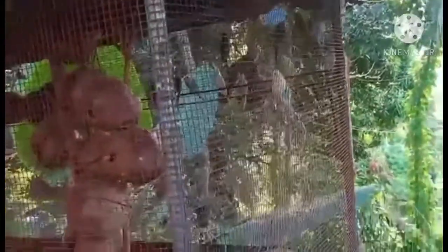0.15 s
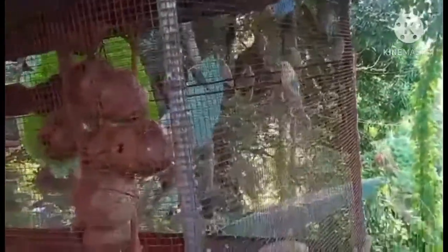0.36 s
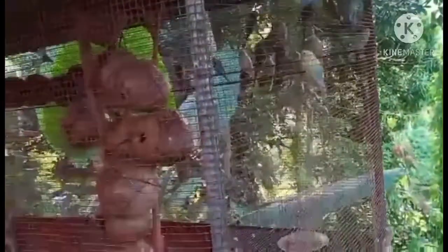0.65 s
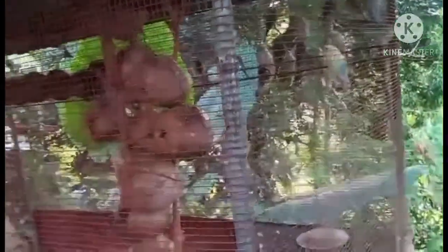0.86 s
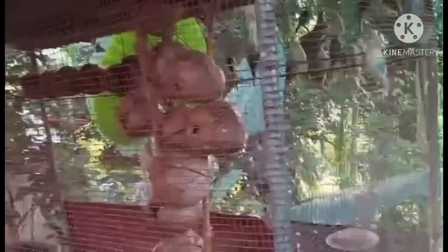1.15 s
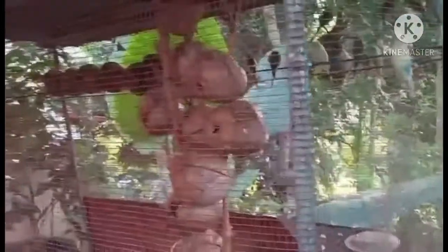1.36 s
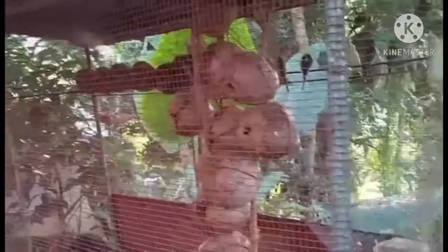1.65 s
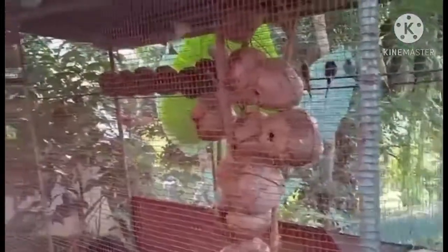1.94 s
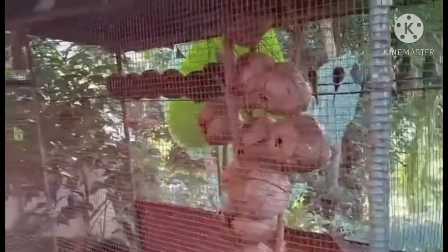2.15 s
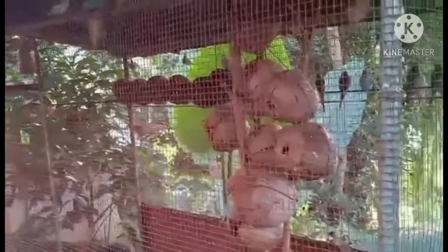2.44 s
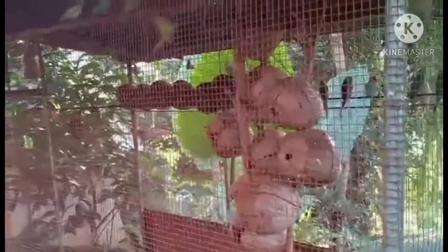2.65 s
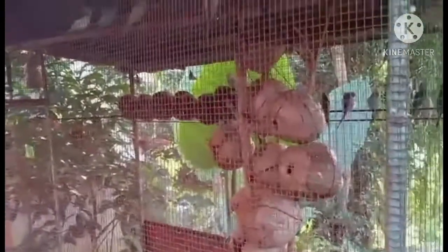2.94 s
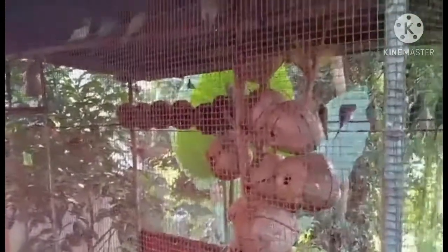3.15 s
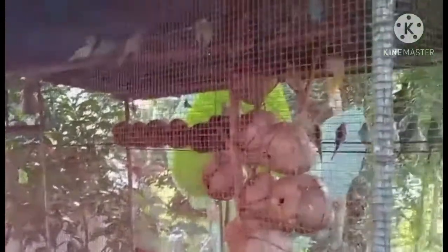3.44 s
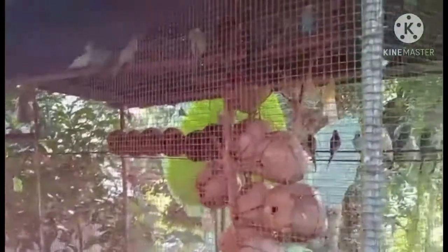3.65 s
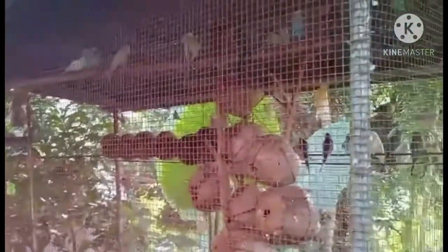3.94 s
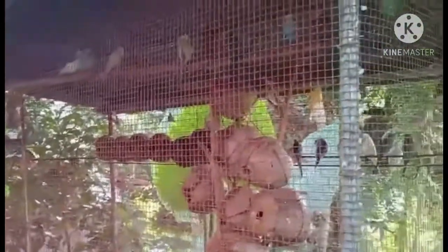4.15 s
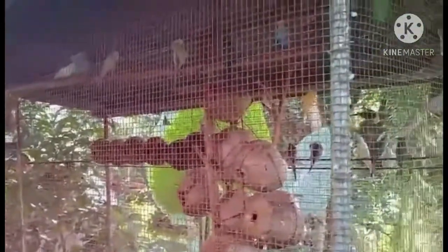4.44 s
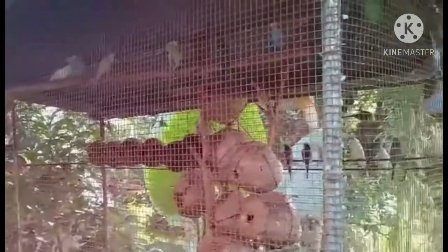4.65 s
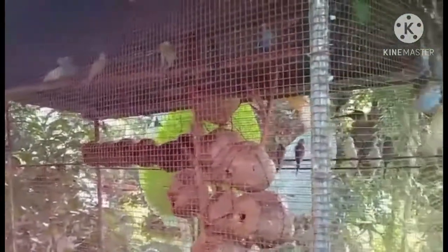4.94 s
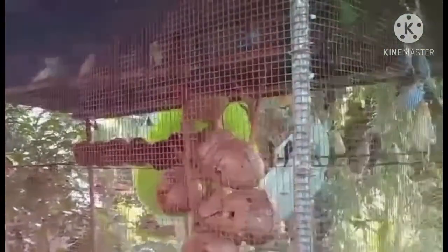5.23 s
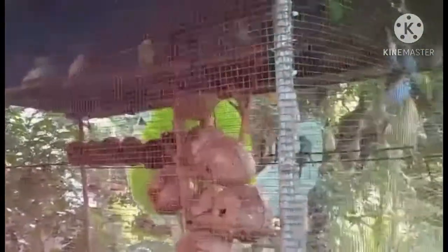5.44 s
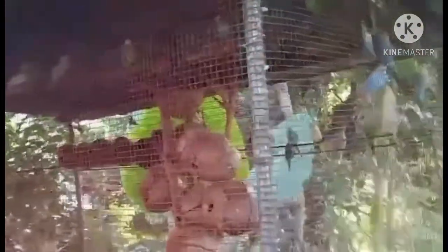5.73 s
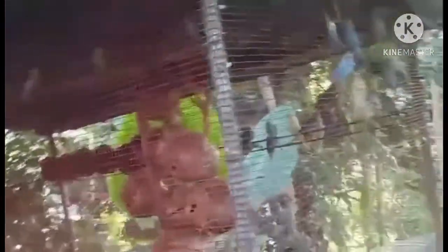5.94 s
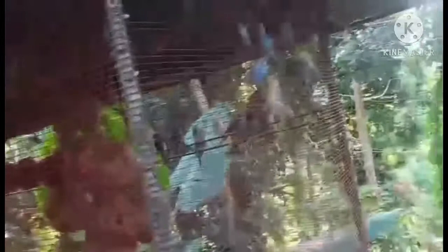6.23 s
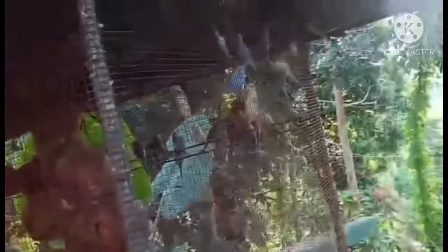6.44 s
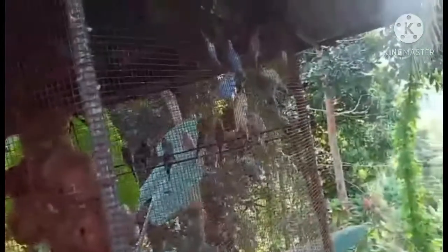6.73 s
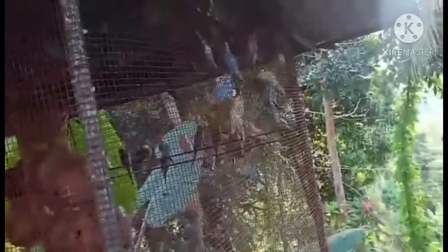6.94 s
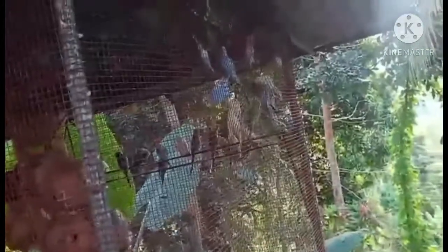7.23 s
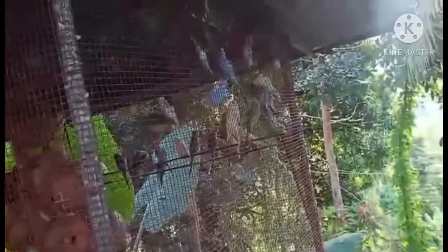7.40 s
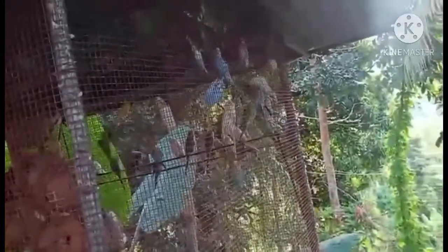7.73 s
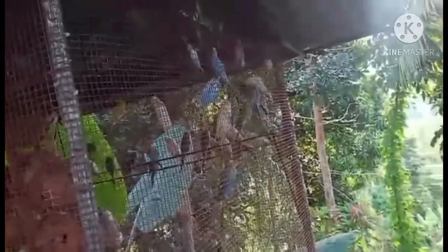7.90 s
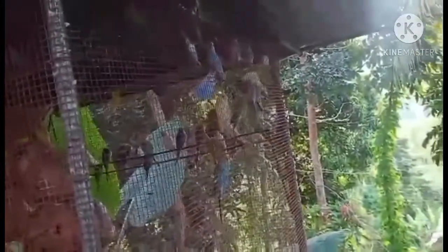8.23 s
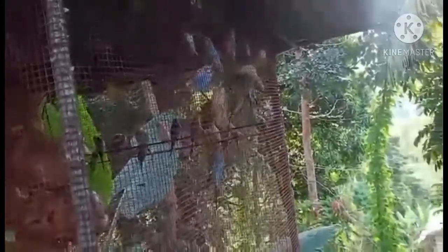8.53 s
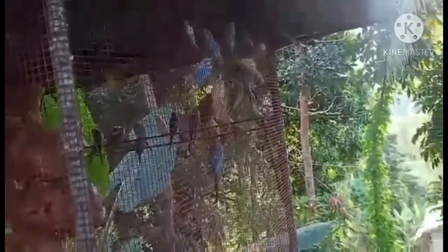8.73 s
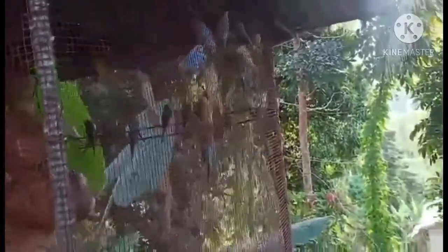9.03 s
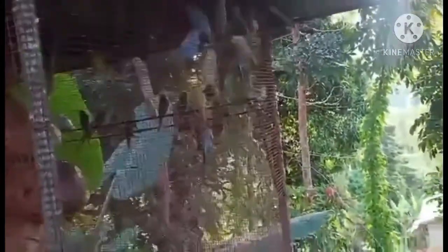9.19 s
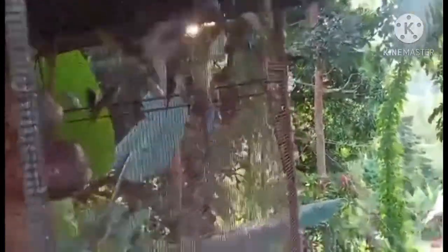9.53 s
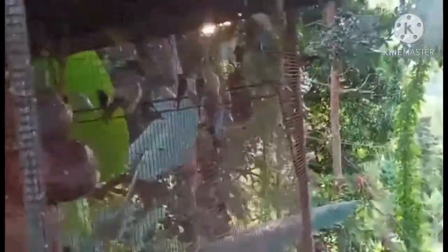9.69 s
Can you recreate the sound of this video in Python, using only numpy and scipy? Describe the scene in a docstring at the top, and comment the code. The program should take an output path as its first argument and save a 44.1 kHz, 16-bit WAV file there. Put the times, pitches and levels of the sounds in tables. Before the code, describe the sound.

Many budgerigars chatter continuously in a roofed wire cage: quick U-shaped whistles, buzzy rasps, nasal squeaks, sharp pips and a dense warble further back. Beaks and claws tick finely on wire. A hoarse rooster crows once, from about two to four seconds. The hand-held stereo microphone is close, with short dense echoes, light hiss, faint low hum and dull handling rubs.

```python
"""A flock of budgerigars chatters in a wire aviary under a roof: swooping whistles, pulsed rasps that ring in
throat and beak, nasal squeaks of sliding harmonics, and a warble of random sweeps further back.
Beaks and claws tick on the wire as filtered clicks. A rooster crows once from the left, hoarsely, with two voices.
The hand-held microphone turns, rustles with dull noise and ticks once over background hiss and a faint hum."""
import sys
import numpy as np
from scipy import signal
from scipy.fft import rfft, irfft, next_fast_len
from scipy.io import wavfile
from scipy.ndimage import uniform_filter1d

SR = 44100
rng = np.random.default_rng(int(sys.argv[2]) if len(sys.argv) > 2 else 0)


def digitize_waveform(pressure):
    """Quantize a signal to 16-bit integers and store it at the path in sys.argv[1].

    Rows of a 2-D input are taken as channels; values are limited to [-1, 1].
    """
    field = np.atleast_2d(pressure).T
    bounded = np.clip(field, -1, 1)
    quanta = np.round(bounded * 32767).astype(np.int16)
    wavfile.write(sys.argv[1], SR, quanta)


N = 434826
TIME = np.arange(N) / SR

# Table levels are relative, ahead of the mix; bird call lengths are nominal, and some calls get a little extra.
# spectrum of the background hiss: f/Hz, density/dB
HISS_SPECTRUM = [(30, -10), (110, 0.5), (300, -6), (800, -8.5), (1100, -2.5), (1450, 7), (2300, -4.5),
                 (3900, -9.5), (5200, -2.5), (6300, 6.5), (7200, -19), (8600, -2), (10000, -26),
                 (14000, -40)]
# swells of the low hum: t/s, level/dB
HUM_LEVEL = [(0.0, -58), (0.47, -76), (0.58, -54), (0.88, -68), (2.36, -53), (2.39, -65.5), (6.78, -61.5),
             (6.97, -99), (7.3, -49), (7.39, -61.5), (8.35, -51), (8.43, -85), (9.72, -50), (9.86, -70)]
# soft rubs of the hand on the housing: t/s, length/s, centre f/Hz, level/dB
HAND_RUBS = [(1.551, 0.17, 269, -53), (1.823, 0.13, 230, -48.5), (1.861, 0.53, 153, -52),
             (4.038, 0.086, 314, -56.5), (5.375, 0.12, 242, -57.5), (6.013, 0.1, 312, -56.5),
             (6.3, 0.11, 322, -62), (8.973, 0.32, 241, -58), (9.337, 0.4, 270, -49.5),
             (9.38, 0.49, 163, -48)]
# how much more the left port hears than the right: f/Hz, difference/dB
PORT_DIFFERENCE = [(100, 1), (400, 0.5), (1200, 6.5), (2300, 7), (4000, -5.5), (5500, 2), (8000, 7.5),
                   (13000, 12.5)]
# liveliness of the birds further back: t/s, level/dB
FLOCK_LEVEL = [(0.0, -38), (0.19, -44.5), (.75, -41), (1.5, -38.5), (1.67, -40.5), (2.0, -35),
               (2.25, -40.5), (3.85, -38.5), (4.01, -40), (4.2, -40), (4.5, -35), (4.7, -40.5),
               (5.16, -42.5), (5.42, -40), (5.79, -40.5), (6.17, -38.5), (6.3, -37), (6.56, -38),
               (6.68, -44.5), (6.75, -34), (7.0, -41), (7.17, -34.5), (7.46, -38.5), (7.85, -37.5),
               (8.41, -39.5), (8.7, -39.5), (8.9, -36.5), (8.98, -50.5), (9.08, -37), (9.26, -56.5),
               (9.86, -50)]
# the crow's leading voice: t/s, pitch f/Hz, fundamental level/dB, overtone level/dB, hoarseness (held to 0-1)
CROW_LEAD = [(2.283, 563, -54, -37, 0.19), (2.326, 624, -30, -30, .1), (2.39, 692, -21.5, -27, 0.3),
             (2.436, 715.5, -24.5, -32, 0.76), (2.481, 680, -33, -34, 0.89), (2.565, 651, -54, -36, 0.92),
             (2.625, 764, -20, -36, 0.76), (2.68, 769, -29, -36, 1.23), (2.771, 707, -47, -43, 1.13),
             (2.815, 737, -24, -31.5, 0.58), (2.9, 732, -32.5, -26, 0.55), (2.946, 703, -24.5, -30, .7),
             (3.03, 702, -31.5, -34, 0.9), (3.2, 657.4, -46, -39, 0.98), (3.281, 639, -44, -46, 0.77),
             (3.319, 681, -24.5, -27.5, 0.3), (3.38, 695, -20, -26.5, .1), (3.448, 661, -27, -34.5, 0.11),
             (3.54, 644, -25, -32, 0.2), (3.651, 607, -35, -41.5, 0.21), (3.69, 567, -37.5, -31, 0.6),
             (3.79, 539.5, -40, -36, 0.65), (3.9, 436, -65, -37.5, 0.4)]
# the crow's lower second voice: t/s, pitch f/Hz, level/dB
CROW_SECOND = [(2.37, 596, -54), (2.42, 596, -22.5), (2.48, 587, -27.5), (2.55, 562.6, -31),
               (2.62, 595, -28), (2.71, 575, -30), (2.765, 613, -25.5), (2.82, 588, -27), (2.86, 584, -41),
               (2.94, 570, -28), (3.05, 597, -26), (3.15, 587, -28), (3.25, 566.6, -38.5), (3.32, 558, -26),
               (3.41, 561, -77), (3.5, 560, -92)]
# colour of the rooster's throat: f/Hz, level/dB
ROOSTER_THROAT = [(450, -16.5), (700, 5), (1000, -20.5), (1300, -15), (1750, -12.5), (2050, -19),
                  (2380, -9.5), (2900, -24.5), (3550, -20), (4300, -28.5), (6000, -36.5), (9500, -40),
                  (13000, -59)]
# resonances of a rasping bird, throat and beak: f/Hz, width/Hz, level/dB
THROAT_MODES = [(2565, 2150, 0.5), (3695, 640, 3.5)]
BEAK_MODES = [(6110, 2400, -1.5), (7850, 1460, -11), (10420, 3400, -32)]
# where near birds sit as the microphone turns: t/s, lag of the left ear/ms, left over right level/dB
# (the level column places contact calls and pips only)
BEARINGS = [(0, 0.26, 3.5), (1.5, 0.049, -3), (2.201, -.28, 1), (3.7, -0.12, -14), (4.8, 0.086, -10),
            (5.4, .08, -5.5), (6, .22, -7), (9.86, 0.3, -1.5)]
# buzzy rasps: t/s, length/s, throat level/dB, treble level/dB
RASP_CALLS = [(0.221, 0.049, -35, -33), (0.392, 0.084, -38.5, -32.5), (0.884, 0.065, -32, -34),
              (1.056, 0.078, -27, -27), (1.552, 0.0026, -44, -29.5), (1.615, 0.011, -42, -35),
              (1.773, 0.044, -34, -45), (1.855, 0.014, -42, -32.5), (1.914, 0.086, -39.5, -38.5),
              (2.589, 0.18, -30.5, -36), (3.875, 0.11, -29.5, -42.5), (4.034, 0.055, -34.5, -38.5),
              (4.212, 0.064, -37, -36.5), (4.3, 0.076, -32.5, -29.5), (4.393, 0.1, -33, -66),
              (4.775, 0.016, -29.5, -41), (4.865, 0.03, -31, -51), (5.099, 0.042, -32, -34.5),
              (5.441, 0.0071, -33, -35.5), (5.485, 0.067, -32, -51), (5.597, 0.025, -31, -33),
              (5.743, 0.017, -35, -34), (5.834, 0.043, -33.5, -28), (5.976, 0.045, -28.5, -27),
              (6.199, 0.03, -33.5, -40), (6.364, 0.025, -36, -36), (6.421, 0.071, -28, -67),
              (6.844, 0.032, -37, -48), (6.898, 0.027, -31, -29), (7.275, 0.015, -36.5, -40),
              (7.71, 0.066, -38, -33.5), (7.783, 0.086, -34, -39), (8.21, 0.036, -35, -52),
              (8.586, 0.04, -32.5, -53), (8.873, 0.027, -39, -33), (9.048, 0.05, -47, -50)]
# contact calls, a dive and a climb back: t/s, length/s, lowest f/Hz, level/dB
CONTACT_ROWS = [(.305, 0.053, 2840, -36), (0.505, 0.046, 2610, -29.5), (0.622, 0.036, 2920, -29.5),
                (0.724, 0.039, 2540, -34), (1.27, 0.073, 2910, -34), (2.058, 0.064, 2690, -31),
                (2.11, 0.049, 2800, -35.5), (2.594, 0.063, 2916, -24), (3.068, 0.086, 3510, -24.5),
                (3.895, 0.077, 3425, -21.5), (4.068, 0.066, 2840, -27.5), (4.389, 0.076, 2800, -27.5),
                (4.597, 0.062, 2860, -30.5), (4.817, 0.055, 2870, -21), (5.305, 0.072, 2807, -21.5),
                (5.407, 0.065, 2450, -31.5), (5.449, 0.049, 3316, -22.5), (6.046, 0.048, 2620, -25),
                (6.233, 0.082, 2640, -31), (6.436, 0.078, 3020, -32), (6.516, 0.065, 2810, -29.5),
                (6.723, 0.061, 2860, -38.5), (7.096, .056, 2780, -29), (7.145, 0.049, 2985, -26.5),
                (7.508, 0.056, 2720, -27), (7.878, 0.072, 3170, -28), (8.063, 0.06, 2750, -26.5),
                (8.661, 0.054, 2724, -27), (9.483, 0.065, 2720, -23.5)]
# low chirrups with a shallow dip: t/s, length/s, middle f/Hz, level/dB
CHIRRUP_ROWS = [(.275, 0.016, 1970, -30), (.705, 0.021, 1932, -27), (5.5, 0.0092, 1450, -27),
                (5.941, 0.052, 1484, -24.5), (6.27, 0.066, 1873, -29.5), (6.49, 0.043, 2154, -26),
                (6.573, 0.019, 2220, -28), (7.205, 0.021, 1906, -30), (7.59, 0.053, 2000, -35),
                (8.125, 0.02, 2306, -26.5)]
# falling slurs: t/s, length/s, middle f/Hz, level/dB
SLUR_ROWS = [(.205, 0.013, 2150, -34), (.79, 0.035, 1396, -33), (.962, 0.021, 1715, -37.5),
             (1.378, 0.024, 3340, -24), (1.412, .02, 1710, -31.5), (2.015, 0.02, 3800, -31),
             (2.14, .018, 1636, -27), (4.218, .022, 3600, -33), (4.455, 0.035, 2400, -29.5),
             (4.545, 0.028, 3560, -27.5), (4.575, 0.018, 3450, -28), (4.798, 0.008, 3230, -27),
             (4.806, 0.015, 2300, -29.5), (5.24, 0.03, 2150, -31.5), (5.38, .022, 2000, -34.5),
             (7.235, .155, 1800, -29), (7.28, 0.13, 2470, -46), (7.4, 0.039, 2760, -46),
             (7.72, 0.07, 1740, -40), (7.85, 0.1, 1680, -33.5), (7.88, 0.017, 2210, -38),
             (8.23, 0.021, 2600, -32), (8.295, 0.02, 1960, -35), (8.318, 0.02, 1740, -31),
             (8.59, 0.071, 3560, -32.5), (8.604, 0.01, 2420, -33), (8.664, 0.017, 2260, -28),
             (8.888, .015, 2215, -33), (9.464, 0.015, 3970, -29)]
# rising tweets: t/s, length/s, middle f/Hz, level/dB
TWEET_ROWS = [(.043, 0.026, 3900, -32.5), (.388, 0.017, 2334, -28), (.882, 0.02, 1980, -31),
              (2.66, 0.081, 4906, -29.5), (3.03, 0.027, 3810, -25), (3.48, 0.026, 3750, -28),
              (4.133, 0.018, 4280, -26.5), (4.505, 0.033, 3380, -33), (5.27, 0.031, 2790, -23),
              (5.813, 0.024, 2580, -28), (6.78, .03, 3350, -37), (7.437, .024, 2480, -36),
              (7.595, 0.029, 2740, -34), (9.022, .016, 2430, -37), (9.25, 0.0095, 2380, -35.5),
              (9.449, 0.011, 3900, -34.5), (9.825, .012, 3800, -32.5)]
# arched peeps: t/s, length/s, top f/Hz, level/dB
PEEP_ROWS = [(.115, 0.12, 3846, -27.5), (.343, 0.007, 3540, -27.5), (.55, 0.045, 3470, -36),
             (.675, 0.032, 2230, -28.5), (1.32, 0.06, 2380, -31), (3.67, 0.062, 4045, -27),
             (7.06, 0.037, 3990, -32), (9.113, 0.028, 2730, -31.5), (9.835, 0.036, 4200, -28)]
# sharp pips and the accents within longer calls: t/s, length/s, middle f/Hz, level/dB
PIP_ROWS = [(0.301, 0.01, 3660, -27), (0.35, 0.021, 2237, -19), (.459, .011, 5280, -31),
            (0.477, 0.013, 2000, -27), (0.723, 0.0066, 1890, -23), (1.55, 0.0069, 5780, -28),
            (2.604, 0.0055, 3220, -28), (3.679, 0.0069, 3787, -25), (3.703, 0.014, 3988, -23),
            (4.795, 0.0061, 3420, -33), (4.815, 0.02, 3580, -16.5), (4.858, 0.015, 3520, -16.5),
            (5.295, 0.009, 4030, -19.5), (5.449, 0.0052, 3890, -14.5), (5.48, 0.011, 3480, -15),
            (5.524, .006, 3040, -19), (5.533, 0.0126, 3830, -22), (5.547, .006, 3100, -19.5),
            (6.899, 0.0052, 4670, -25.5), (6.484, 0.0093, 3600, -40), (6.498, 0.01, 2220, -24),
            (6.512, 0.0095, 3640, -28), (7.14, 0.011, 3340, -28), (7.181, 0.019, 3445, -28),
            (7.941, 0.0061, 3520, -22), (8.667, 0.0088, 3445, -31), (9.115, 0.0064, 2480, -26),
            (9.131, 0.013, 2565, -30), (9.49, .008, 3460, -29), (9.56, 0.0061, 4110, -24)]
# nasal squeaks: t/s, length/s, first f/Hz, middle f/Hz, last f/Hz, level/dB
SQUEAK_ROWS = [(0, 0.041, 2570, 2893, 3050, -25), (0.254, 0.036, 3330, 2935, 3700, -24),
               (0.42, 0.039, 2815, 2890, 3860, -28.5), (4.26, 0.063, 3420, 2660, 3320, -26),
               (4.323, 0.047, 2750, 3100, 3700, -35), (5.605, 0.034, 2764, 2857, 2930, -14),
               (5.686, 0.037, 2315, 2635, 2750, -23), (5.867, 0.0235, 2830, 2660, 2850, -24),
               (6.372, 0.03, 2960, 3060, 3330, -25.5), (7.707, 0.036, 3470, 3120, 3200, -26),
               (7.79, 0.035, 2800, 2780, 2930, -23)]
# colour of a squeak's harmonics, strongest in the beak's resonance: f/Hz, level/dB
SQUEAK_SPECTRUM = [(2000, 3.5), (3000, -8), (4200, 8), (5600, 0), (7000, -2.5), (8600, -16), (11000, -20.5),
                   (14000, -30)]

HISS_DB, FLOCK_DB = -45.5, 2
AVIARY_T60_S, ECHO_CHANGE_S = 0.26, .4
CUTOFF_HZ = 13500
CROW_EDGE_S = 0.012  # fade at each end of the crow
CONTACT_FROM_HZ, CONTACT_TO_HZ = 4100, 3732  # nominal first and last pitch of every contact call
# the throat favours the overtones of low notes: their level for a 2 kHz note, and its slope as the note goes up
OVERTONE_DB, OVERTONE_DB_PER_OCTAVE = -10, -11.5
# high notes are rougher: roughness gained per octave above a middling pitch
ROUGH_PER_OCTAVE, MIDDLING_HZ = 0.71, 2340


def from_db(db):
    """Decibels to linear gain."""
    return 10 ** (np.asarray(db) / 20)


def rms_one(x):
    """Sound scaled to an rms of 1."""
    return x / np.sqrt(np.mean(x ** 2) + 1e-20)


def in_time(rows):
    """Each column of a curve at every sample."""
    t, *columns = np.transpose(rows)
    return [np.interp(TIME, t, c) for c in columns]


def at_hz(points, hz):
    """A spectrum read on a log-frequency axis."""
    known, values = np.transpose(points)
    return np.interp(np.log(np.maximum(hz, 1)), np.log(known), values)


def coloured(x, spectrum):
    """Sound with a smooth spectrum laid on it."""
    size = next_fast_len(N + 4096)
    gain = from_db(at_hz(spectrum, np.fft.rfftfreq(size, 1 / SR)))
    return irfft(rfft(x, size) * gain, size)[..., :N]


def filtered(x, order, hz, kind="high"):
    """Butterworth filter, high-pass unless told otherwise."""
    return signal.sosfilt(signal.butter(order, hz, kind, fs=SR, output="sos"), x)


def drift(rate, size):
    """Smooth chance with about `rate` turns a second; spread near 1."""
    at = np.arange(size) * rate / SR
    knots = rng.standard_normal(size // 8 + 2)
    return np.interp(at, np.arange(len(knots)), knots) * np.sqrt(3 / 2)


def resonate(x, modes):
    """Parallel band-pass resonances with steep skirts."""
    return sum(from_db(db) * filtered(x, 2, [hz - width / 2, hz + width / 2], "band")
               for hz, width, db in modes)


def swell(size, edge):
    """A note's rise and fall, together taking the share `edge` of its length; rms 1."""
    return rms_one(signal.windows.tukey(size, np.clip(edge, .05, 1)))


def add(out, sound, start, pan_db, lag_ms):
    """Put a sound in the stereo picture by level and by arrival time."""
    gains = rms_one(np.array([from_db(pan_db / 2), from_db(-pan_db / 2)]))
    for ear, gain, delay in zip(out, gains, (lag_ms / 2, -lag_ms / 2)):
        i = max(0, round((start + delay / 1000) * SR))
        part = ear[i:i + len(sound)]
        part += gain * sound[:len(part)]


def bearing(when):
    """Lag (ms) and level difference (dB) between the ears at one moment."""
    t, *columns = np.transpose(BEARINGS)
    return [np.interp(when, t, c) for c in columns]


def background(hum_hz=81, waver_db=3.5, hiss_flicker_db=2.5):
    """Background hiss as coloured noise, more alike in both ears in the bass, over a wavering sine hum."""
    mid, side = rng.standard_normal((2, N))
    side = coloured(side, [(100, -17), (400, -11.0), (1500, 0.5), (5000, -1.0)])
    hiss = rms_one(coloured(mid + side * [[1], [-1]], HISS_SPECTRUM))
    hiss_level = from_db(HISS_DB + hiss_flicker_db * drift(10, N))
    hum = np.sin(2 * np.pi * np.cumsum(hum_hz + 4 * drift(7.0, N)) / SR)
    hum_level = from_db(in_time(HUM_LEVEL)[0] + waver_db * drift(23, N))
    return hiss_level * hiss + hum_level * hum


def handling(width=0.35):
    """Fingers shift on the housing: short, dull rubs of band-passed noise, `width` times as wide as their centre."""
    out = np.zeros((2, N))
    for start, length, hz, db in HAND_RUBS:
        size = int(length * SR)
        noise = rng.standard_normal(size)
        rub = rms_one(resonate(noise, [(hz, width * hz, 0)])) * swell(size, 0.27)
        add(out, from_db(db) * rub, start, 0, 0)
    return out


def tick(at_s=8.9786, hz=1450, envelope_db=-17, width_s=0.00079):
    """A dry tick: a sine burst about two cycles long under a bell-shaped envelope."""
    t = TIME - at_s
    return from_db(envelope_db) * np.exp(-(t / width_s) ** 2) * np.sin(2 * np.pi * hz * t)


def aviary(x, t60, early_s=0.0051, early_db=6):
    """Dense early echoes from roof and nest pots, then a short tail; they change as birds and microphone move."""
    t, hop = TIME[:SR // 2], int(ECHO_CHANGE_S * SR)
    tail = from_db(-60 * t / t60)
    early = from_db(early_db) * np.exp(-t / early_s)
    decay = (tail + early) * (t > .0007)
    x = np.pad(x, ((0, 0), (hop, 2 * hop)))
    out = np.zeros((2, N + 3 * hop + len(t)))
    # overlapping stretches, each with a new echo pattern, crossfade at equal power
    for i in range(0, N + hop, hop):
        mid, side = rng.standard_normal((2, len(t)))
        side = filtered(side, 1, 500)
        echoes = (mid + side * [[1], [-1]]) * decay
        echoes /= np.sqrt(np.sum(echoes ** 2, axis=1, keepdims=True))
        stretch = x[:, i:i + 2 * hop] * signal.windows.cosine(2 * hop)
        wet = signal.fftconvolve(stretch, echoes, axes=1)
        out[:, i:i + wet.shape[1]] += wet
    return out[:, hop:hop + N]


def scrabble(per_s=260, level_db=-13, size_db=7.5):
    """Fine ticks of beaks and claws on wire and perches: random clicks, as lively as the flock."""
    sizes = from_db(size_db * np.minimum(rng.exponential(1, N), 4)) * rng.standard_normal((2, N))
    chance = per_s * from_db(4 * drift(20, N)) / SR
    ticks = sizes * (rng.random(N) < chance)
    return from_db(level_db + in_time(FLOCK_LEVEL)[0]) * rms_one(resonate(ticks, BEAK_MODES))


def glide(rows):
    """A curve with rounded corners: a throat cannot jump."""
    return [uniform_filter1d(c, int(.035 * SR)) for c in in_time(rows)]


def crow_stack(multiples, hz, phase):
    """Partials at multiples of the pitch, weighted by the rooster's throat and frayed in phase; rms 1."""
    size = len(phase)
    return rms_one(sum(from_db(at_hz(ROOSTER_THROAT, k * hz)) * np.sin(k * (phase + .11 * drift(420, size)))
                       for k in multiples))


def crow_voice(hz, hoarse, hiss_db):
    """Fundamental, overtones and half-way tones; hoarseness shakes pitch and strength, air puffs once a cycle."""
    size = len(hz)
    shake = .007 * drift(900, size) + hoarse * (.008 * drift(60, size) + .026 * drift(420, size))
    shimmer = from_db(3.2 * hoarse * drift(260, size))
    phase = 2 * np.pi * np.cumsum(hz * (1 + shake)) / SR
    air = filtered(coloured(rng.standard_normal(N), ROOSTER_THROAT), 4, 1300)[:size]
    puffs = from_db(hiss_db) * rms_one(air * (1 + np.cos(phase)))
    fundamental = np.sqrt(shimmer) * np.sin(phase)
    overtones = shimmer * (crow_stack(np.arange(2, 18), hz, phase) + puffs)
    halves = shimmer * crow_stack(np.arange(1, 12) + .5, hz, phase)
    return fundamental, overtones, halves


def rooster(half_db=-9, hiss_db=-11, overtones_db=-2, second_db=-2):
    """Two sides of the syrinx: one carries the tune, the other adds a lower voice; half-way tones roughen the lead."""
    start, end = CROW_LEAD[0][0], CROW_LEAD[-1][0]
    during = (TIME >= start) & (TIME <= end)
    pitch, fundamental_level, overtone_level, hoarse = [c[during] for c in glide(CROW_LEAD)]
    second_pitch, second_level = [c[during] for c in glide(CROW_SECOND)]
    hoarse = np.clip(hoarse, 0, 1)
    fundamental, overtones, halves = crow_voice(pitch, hoarse, hiss_db)
    second = crow_voice(second_pitch, hoarse, hiss_db)[1]
    note = (np.sqrt(2) * from_db(fundamental_level) * fundamental
            + from_db(overtone_level + overtones_db) * (overtones + hoarse * from_db(half_db) * halves)
            + from_db(second_level + second_db) * second)
    note = filtered(note, 6, 480)
    t = TIME[:len(note)]
    fade = np.minimum(1, np.minimum(t, t[::-1]) / CROW_EDGE_S)
    out = np.zeros((2, N))
    add(out, fade * note, start, 0, lag_ms=-0.25)
    return out


def swoop(size, pitches, corner):
    """Pitch through first, middle and last value: straight for corner 1, a bowl for 2, flat-bottomed above."""
    first, middle, last = pitches
    u = np.linspace(-1, 1, size)
    return middle + (np.where(u < 0, first, last) - middle) * np.abs(u) ** corner


def whistle(length, pitches, overtone_db, rough, corner=2, flutter_db=5, third_db=-14, edge=0.4):
    """One swoop of the syrinx; a fast, uneven tremor of the membrane spreads it into side tones."""
    size = int(length * SR)
    rough = np.clip(rough, .05, 1)
    tremor_hz = rng.uniform(250, 600) * np.exp(.25 * drift(400, size))
    tremor = np.sin(2 * np.pi * np.cumsum(tremor_hz) / SR)
    wobble = .011 * drift(180, size) + .045 * rough * (tremor + drift(1500, size))
    hz = swoop(size, pitches, corner) * (1 + wobble)
    phase = 2 * np.pi * np.cumsum(hz) / SR
    second = np.sin(2 * phase)
    third = from_db(third_db) * np.sin(3 * phase)
    fourth = from_db(2 * third_db) * np.sin(4 * phase) * (4 * hz < SR / 2)
    flutter = from_db(flutter_db * np.sqrt(rough) * drift(208.0, size))
    loudness = swell(size, edge) * flutter * (1 + .5 * rough * tremor)
    return np.sqrt(2) * rms_one(loudness) * (np.sin(phase) + from_db(overtone_db) * (second + third + fourth))


def reedy(hz, colour):
    """The pressed voice: five harmonics that slide through fixed resonances; rms 1."""
    phase = 2 * np.pi * np.cumsum(hz) / SR
    return rms_one(sum(from_db(at_hz(colour, k * hz)) * (k * hz < SR / 2) * np.sin(k * phase)
                       for k in range(1, 6)))


def rasp(length, throat_db, treble_db, pulse_hz=260, air_db=-13, squeal_hz=2900):
    """Uneven snaps, air puffs and a zigzag squeal ring in throat and beak, which shift from call to call."""
    size = int((length + .02) * SR)
    pulse_rate = pulse_hz * np.exp(.2 * rng.normal() + .3 * drift(200, size))
    cycles = np.cumsum(pulse_rate) / SR
    snaps = np.diff(np.floor(cycles), prepend=0) * rng.uniform(.4, 1, size)
    gate = np.exp(np.cos(2 * np.pi * cycles))
    puffs = rms_one(rng.standard_normal(size) * gate)
    bursts = rms_one(snaps) + from_db(air_db) * puffs
    squeal = reedy(squeal_hz * np.exp(.16 * drift(130, size)), SQUEAK_SPECTRUM) * np.sqrt(gate)
    out = np.zeros(size)
    for db, modes in ((throat_db, THROAT_MODES), (treble_db, BEAK_MODES)):
        shifted = [(hz * np.exp(.06 * rng.normal()), width, g) for hz, width, g in modes]
        voice = rms_one(resonate(bursts, shifted)) + rms_one(resonate(squeal, shifted))
        out += from_db(db) * rms_one(voice * swell(size, .85))
    return out


def warble(count=900, low_hz=1650, high_hz=3500, spread_db=4, overtone_db=-10):
    """Quick random sweeps of the birds further back, more often falling than rising."""
    out = np.zeros((2, N))
    for k, (when, long, height, rough) in enumerate(rng.random((count, 4))):
        middle = low_hz * (high_hz / low_hz) ** height
        pitches = middle * np.exp(.2 * rng.normal([.9, 0, -.2], [1, .2, 1.2]))
        note = whistle(.01 + .026 * long, np.maximum(pitches, 1300), overtone_db, .1 + .55 * rough, corner=1.6)
        gain = from_db(spread_db * rng.uniform(-0.37, 0.54))
        start = (k + when) / count * N / SR
        add(out, gain * note, start, pan_db=rng.normal(0, 8.3), lag_ms=rng.normal(0.14, .15))
    return rms_one(out) * from_db(FLOCK_DB + in_time(FLOCK_LEVEL)[0])


def bickering(count=70, length_s=0.0096, treble_db=-6, spread_db=5):
    """Fainter rasps from all round the cage, as lively as the flock."""
    out = np.zeros((2, N))
    for k, (when, long, side) in enumerate(rng.random((count, 3))):
        start = (k + when) / count * N / SR
        db = np.interp(start, *np.transpose(FLOCK_LEVEL))
        sound = rasp(length_s * (.5 + long), db, db + treble_db)
        add(out, sound, start, spread_db * (2 * side - 1), bearing(start)[0])
    return out


def rasps(pan_db=-2.0):
    """Scolding close by: pulsed, buzzy bursts of the syrinx."""
    out = np.zeros((2, N))
    for start, length, throat_db, treble_db in RASP_CALLS:
        add(out, rasp(length, throat_db, treble_db), start - .01, pan_db, bearing(start)[0])
    return out


def overtone(hz):
    """Level of a note's overtones in dB, by its pitch."""
    return OVERTONE_DB + OVERTONE_DB_PER_OCTAVE * np.log2(hz / 2000)


def squeaks(wobble=0.016, flutter_db=3, pan_db=-5):
    """Nasal squeaks whose second harmonic carries the sound."""
    out = np.zeros((2, N))
    for start, length, *pitches, db in SQUEAK_ROWS:
        size = int(length * SR)
        hz = swoop(size, pitches, 2) * (1 + wobble * drift(492, size))
        loudness = swell(size, 0.15) * from_db(flutter_db * drift(310, size))
        voice = rms_one(reedy(hz, SQUEAK_SPECTRUM) * loudness)
        add(out, from_db(db) * voice, start, pan_db, bearing(start)[0])
    return out


def pips(fall=0.089, overtone_db=-17):
    """Clean, abrupt downward flicks of the syrinx."""
    out = np.zeros((2, N))
    for start, length, hz, db in PIP_ROWS:
        lag_ms, pan_db = bearing(start)
        pitches = (hz * (1 + fall), hz, hz * (1 - fall))
        note = whistle(length, pitches, overtone_db, rough=0.09, corner=0.54, edge=0.99)
        add(out, from_db(db) * note, start, pan_db, lag_ms)
    return out


def calls(rows, first, last, corner, rough, pan_db, nasal_db):
    """Whistles of one kind share a contour: first and last pitch as multiples of the middle one."""
    out = np.zeros((2, N))
    for start, length, hz, db in rows:
        roughness = rough + ROUGH_PER_OCTAVE * np.log2(hz / MIDDLING_HZ)
        pitches = (first * hz, hz, last * hz)
        note = whistle(length + 0.0053, pitches, overtone(hz) + nasal_db, roughness, corner)
        add(out, from_db(db) * note, start - .003, pan_db, bearing(start)[0])
    return out


def contact_calls(buzz_db=-9, buzz_s=0.0078, drop_db=-9, drop_s=0.029, drop_hz=2250):
    """Birds, mostly on the right, keep in touch with U-shaped swoops that break into a buzz and drop away."""
    out = np.zeros((2, N))
    for start, length, lowest, db in CONTACT_ROWS:
        lag_ms, pan_db = bearing(start)
        pitches = (CONTACT_FROM_HZ, lowest, CONTACT_TO_HZ)
        note = whistle(length + .005, pitches, overtone(lowest) - 6, rough=.32, corner=1.7, edge=.25)
        drop_pitches = drop_hz * np.exp(.06 * rng.normal()) * np.array([1.35, 1, .85])
        drop = whistle(drop_s, drop_pitches, overtone(drop_hz), rough=.5, corner=1)
        buzz = rasp(buzz_s, db + buzz_db, db + buzz_db - 22.5)
        add(out, from_db(db) * note, start - .003, pan_db, lag_ms)
        add(out, buzz, start + length - .006, pan_db, lag_ms)
        add(out, from_db(db + drop_db) * drop, start + length, pan_db, lag_ms)
    return out


def chirps():
    """The near birds' repertoire of whistles and squeaks, all voiced by the syrinx."""
    tweets = calls(TWEET_ROWS, first=.84, last=1.15, corner=0.94, rough=0.79, pan_db=-4.5, nasal_db=2)
    chirrups = calls(CHIRRUP_ROWS, first=1.25, last=1.08, corner=4, rough=.35, pan_db=4.0, nasal_db=-3)
    slurs = calls(SLUR_ROWS, first=1.2, last=.8, corner=1, rough=.18, pan_db=-1.5, nasal_db=-4)
    peeps = calls(PEEP_ROWS, first=.86, last=.9, corner=2, rough=.35, pan_db=-2.0, nasal_db=0)
    return contact_calls() + squeaks() + pips() + tweets + chirrups + slurs + peeps


def scene():
    """Near birds, far birds and the rooster, each with aviary echoes, over the background."""
    whistled, rasped, far, crow = chirps(), rasps() + bickering(), warble(), rooster()
    to_echo = from_db(0.5) * rasped + from_db(-3.0) * far + scrabble()
    birds = from_db(-4.5) * rasped + from_db(-2) * far + aviary(to_echo, AVIARY_T60_S)
    # the whistlers sit close by, just under the roof, so their sweeps stay sharp
    near = whistled + from_db(-2) * aviary(whistled, AVIARY_T60_S, early_s=.002, early_db=13)
    # small throats radiate little below their lowest note
    birds = filtered(birds + from_db(-4.0) * near, 6, 1250)
    # roof and nest pots scatter the crow's harmonics more than its long fundamental wave
    scattered = coloured(crow, [(750, -6), (1300, 0)])
    crow = from_db(-0.5) * crow + from_db(3.0) * aviary(scattered, t60=0.27)
    crow = crow * from_db([[.2], [-.2]])  # a touch louder on the left
    return birds + crow + background() + handling() + tick()


def record(dry):
    """The two microphone ports differ in colour; a steep low-pass cuts the top."""
    heard = []
    for ear, sign in zip(dry, (1, -1)):
        heard.append(coloured(ear, [(hz, sign * db / 2) for hz, db in PORT_DIFFERENCE]))
    low_pass = signal.ellip(10, .2, 80, CUTOFF_HZ, fs=SR, output="sos")
    return signal.sosfilt(low_pass, np.array(heard))


dry = scene()
out = record(dry)
digitize_waveform(out)
```